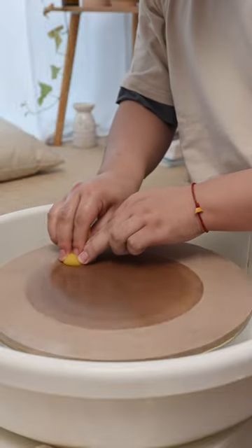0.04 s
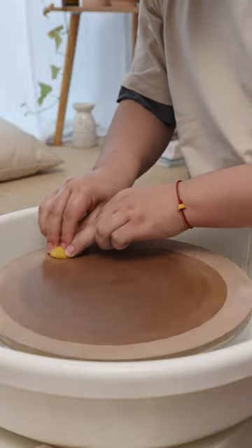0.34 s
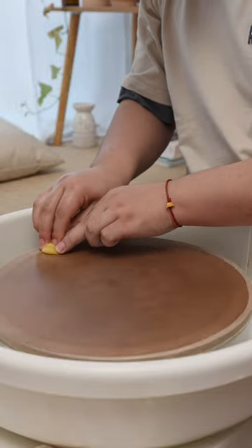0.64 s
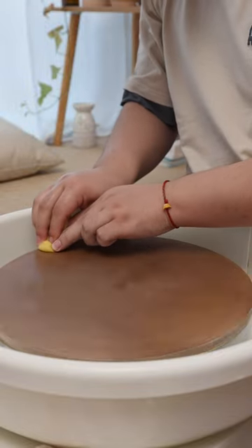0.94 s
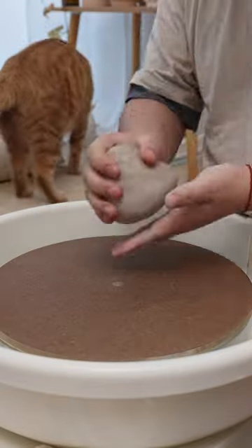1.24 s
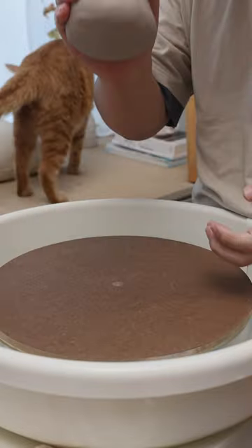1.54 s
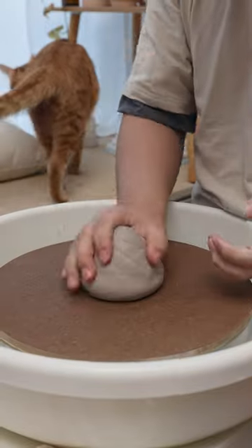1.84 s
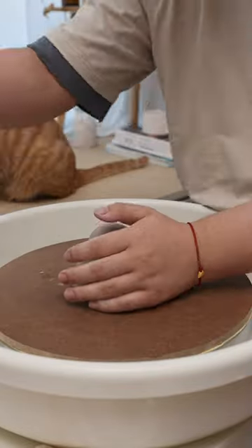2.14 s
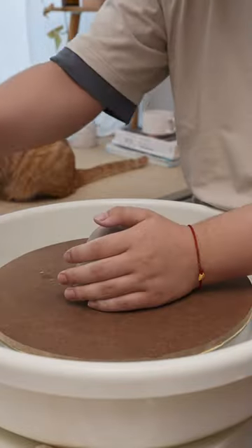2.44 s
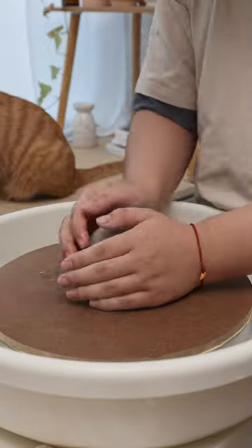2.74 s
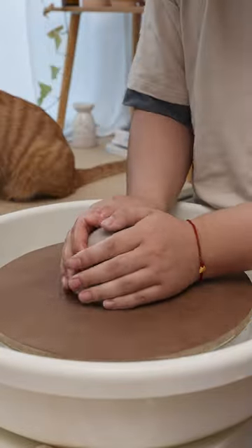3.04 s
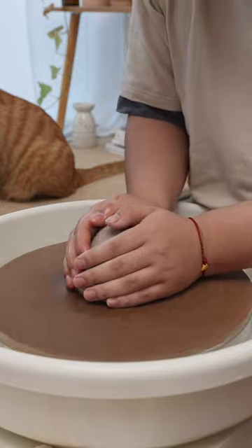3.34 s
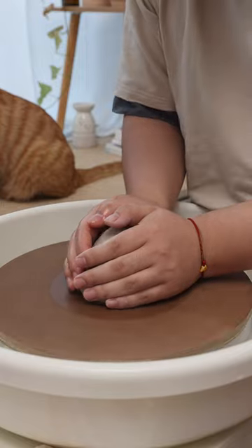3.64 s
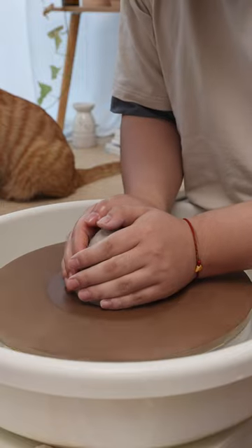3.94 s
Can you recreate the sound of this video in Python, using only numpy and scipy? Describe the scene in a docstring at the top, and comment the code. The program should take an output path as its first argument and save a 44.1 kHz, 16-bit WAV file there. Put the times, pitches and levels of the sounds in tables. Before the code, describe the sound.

A wet sponge hisses on a pottery wheel, then clay thuds down and is rubbed.

```python
"""A pottery wheel in a small room, in three scenes joined by hard cuts.
First a wet sponge hisses on the spinning bat, singing higher as it slides out to the rim.
Then, on the stopped wheel, a clay lump is lifted, thuds down and is patted while the wheel booms.
Last, with the wheel running, water plops as a hand is wetted, and wet palms rub the turning clay:
air pockets pop, and friction makes the wheel's body drone and groan."""
import sys
import numpy as np
from scipy import signal
from scipy.fft import rfft, irfft, next_fast_len
from scipy.io import wavfile
from scipy.ndimage import uniform_filter1d, map_coordinates

SR = 44100
rng = np.random.default_rng(int(sys.argv[2]) if len(sys.argv) > 2 else 0)


def waveform_to_disk(signal):
    """Save audio, clipped to [-1, 1], as 16-bit WAV at the path in sys.argv[1]."""
    frames = np.transpose(np.atleast_2d(signal))
    scaled = np.clip(frames, -1, 1) * 32767
    samples = np.round(scaled).astype(np.int16)
    wavfile.write(sys.argv[1], SR, samples)


N = 176400
T = np.arange(N) / SR
AGE = T[:SR]  # the one-second clock of a single hit


def amp(db):
    """Decibels to gain."""
    return 10 ** (np.asarray(db) / 20)


def unit(x):
    """Scale to rms 1."""
    return x / np.sqrt(np.mean(x ** 2) + 1e-20)


def along(points, hz):
    """Read (Hz, value) points on a log frequency axis."""
    freqs, values = np.transpose(points)
    return np.interp(np.log(hz + 1), np.log(freqs + 1), values)


def curves(rows):
    """One automation curve for each column after the time."""
    times, *columns = np.transpose(rows)
    return [np.interp(T, times, column) for column in columns]


def wobble(rate):
    """A smooth random curve with `rate` knots a second."""
    return map_coordinates(rng.standard_normal(int(N * rate / SR) + 4), [T * rate])


def fade(t60, t=AGE):
    """Exponential decay, 60 dB down after t60 seconds."""
    return np.exp(-np.log(1000) * t / np.maximum(t60, 1e-4))


def attack(seconds):
    """A hit's onset, with this time constant."""
    return 1 - np.exp(-AGE / seconds)


def swell(peak_s, spread_s):
    """A bell-shaped rise and fall."""
    return np.exp(-.5 * ((T - peak_s) / spread_s) ** 2)


def add(track, start_s, sound):
    """Mix a sound into the track."""
    part = track[round(start_s * SR):][:len(sound)]
    part += sound[:len(part)]


def filtered(x, response):
    """EQ x with a gain given as a function of Hz."""
    size = next_fast_len(N + SR // 2)
    return irfft(rfft(x, size) * response(np.fft.rfftfreq(size, 1 / SR)), size)[..., :N]


def rush(spectrum, patchy_db=0):
    """Coloured noise of rms 1, with patches of random gain in time and frequency."""
    bins = signal.stft(rng.standard_normal(N), nperseg=512)[2]
    patches = uniform_filter1d(rng.standard_normal(bins.shape), size=9, axis=0)
    patches = uniform_filter1d(patches, size=14, axis=1)
    noise = signal.istft(bins * amp(patchy_db * unit(patches)), nperseg=512)[1][:N]
    return unit(filtered(noise, lambda hz: amp(along(spectrum, hz))))


def narrow(hz, width_hz):
    """Noise of rms 1 in one resonance; hz may move."""
    band = filtered(rng.standard_normal(N), lambda f: 1 / (1 + (f / width_hz) ** 2))
    return unit(band * np.sin(2 * np.pi * np.cumsum(hz * np.ones(N)) / SR))


# The palms' strokes. Each row: time in seconds, relative hiss level in dB, relative smear level in dB.
PALM_STROKES = [(2.7, -44.5, -41.5), (2.89, -47.5, -39.5), (2.96, -50, -51.5), (3.08, -28.5, -34.5),
                (3.232, -24.5, -36), (3.434, -25, -37.5), (3.464, -29.5, -44.5), (3.506, -32.5, -37),
                (3.576, -28, -38.5), (3.63, -37, -38), (3.698, -26.5, -38), (3.764, -30, -37),
                (3.774, -28.5, -26), (3.782, -25, -35), (3.956, -30, -39.5), (4.0, -33.5, -29.5)]
# The palms' drag on the wheel. Each row: time in seconds, drone level in dB.
PALM_DRAG = [(2.15, -81), (2.84, -60), (2.885, -36), (2.97, -41), (3.1, -41), (3.21, -38.5), (3.4, -40),
             (3.62, -41), (3.72, -40), (3.85, -35.5), (3.94, -37.5), (4, -31)]
# Tone of the bright slip and the dull smear. Each row: frequency in Hz, relative level in dB.
SLIP_EQ = [(600, -35.5), (1500, 2.5), (2300, -3), (3700, 0.5), (5000, -3), (6700, 0), (9000, -2.5),
           (12000, -2), (16000, -3.5)]
SMEAR_EQ = [(100, -16), (500, -3.5), (800, 2), (1150, 2.5), (1600, -8.5), (2100, -1.5), (3000, -20.5),
            (8000, -37)]


def palms():
    """Wet skin slides on turning clay: fizzy hiss, lower smear and rumble over the sounding wheel."""
    slip_db, smear_db = curves(PALM_STROKES)
    slip = amp(slip_db + 1) * rush(SLIP_EQ, patchy_db=-0.1) * amp(1.34 * wobble(1500))
    smear = amp(smear_db + 0.5) * rush(SMEAR_EQ, patchy_db=1) * amp(0.71 * wobble(180))
    rumble_gain = amp(smear_db - 11.5 + 3 * wobble(9))
    rumble = rumble_gain * rush([(20, 6.5), (45, -2), (70, -3.5), (130, -27.5), (500, -62.5)])
    touch = np.interp(T, [2.65, 3.05], [0, 1])
    return touch * (pan_echoes(slip + smear) + rumble) + drone(PALM_DRAG) + groan()


# The sponge's wipe. Each row: time in seconds, relative hiss level in dB.
SPONGE_WIPE = [(0.0, -25.5), (0.024, -27.5), (0.342, -29), (0.418, -29), (0.534, -31), (0.632, -28.5),
               (0.786, -30), (0.846, -29.5), (1.034, -32), (1.066, -31), (1.13, -33.5)]
# Water film squeezed out. Each row: time in seconds, resonance in Hz, relative level in dB.
FILM_SQUEEZE = [(0, 6400, -40), (.12, 6200, -37), (.23, 6300, -28.5), (.33, 6700, -30), (.46, 7300, -26.5),
                (.58, 7700, -31), (.72, 8200, -35), (.78, 8300, -54), (1.13, 8800, -45.5)]
# The sponge's drag on the wheel. Each row: time in seconds, relative drone level in dB.
SPONGE_DRAG = [(0.0, -42), (0.028, -42), (0.428, -45), (0.496, -39.5), (0.528, -42), (0.678, -39.5),
               (0.73, -48.5), (0.776, -34.5), (0.848, -41.5), (0.902, -44), (0.918, -35), (0.978, -44),
               (1.0, -35.5), (1.044, -42.5), (1.066, -36), (1.13, -45)]
# Tone of the hiss and the film's broad fizz. Each row: frequency in Hz, relative level in dB.
HISS_EQ = [(100, -10), (500, -23.5), (1100, -17), (2000, -11.5), (2900, -8.5), (3600, -11), (4350, -2),
           (5000, -11.5), (6000, -5.5), (8000, -5), (12500, 0), (16000, -4.5)]
FIZZ_EQ = [(400, -24), (1100, -10), (2000, -9.5), (3100, -3), (5500, 2), (9300, 5), (11000, -7.5),
           (16000, -16.5)]


def sponge():
    """Fine hiss, with two resonances that climb as the sponge slides out to the faster rim."""
    hiss_db, = curves(SPONGE_WIPE)
    hz, squeeze_db = curves(FILM_SQUEEZE)
    width_hz = .08 * hz.mean()
    sing = narrow(hz, width_hz) + amp(-9) * narrow(1.27 * hz, width_hz)
    film = amp(squeeze_db) * (amp(-1.5) * sing + amp(-0.5) * rush(FIZZ_EQ, patchy_db=1.0))
    hiss = amp(hiss_db + 3.5) * rush(HISS_EQ, patchy_db=2.0)
    return pan_echoes(hiss + film) * amp(0.38 * wobble(72.6)) + amp(1.5) * drone(SPONGE_DRAG)


# The lump's landing, then the pats. Each row: start in seconds, gain in dB, crack level within
# the blow in dB, corner in Hz above which the ring is dulled.
BLOWS = [(1.899, 1, -2.5, 5000), (1.92, -15.5, -8, 900), (1.929, -9, -31.5, 600), (1.977, -30, -1, 900),
         (2.1087, -23, -16, 1200), (2.117, -19, -12, 400), (2.123, -25, -18, 700)]
# Modes of the struck clay and wheel. Each row: pitch in Hz, relative level in dB, t60 in seconds.
THUD_MODES = [(63.4, -26, 0.16), (197, -12, 0.051), (281, -11.5, 0.1), (367, -22.5, 0.23),
              (402, -3.5, 0.054), (435, -25, 0.37), (632, -18, 0.15), (793, 2, 0.013), (1010, -27, .04),
              (1280, -40, 0.12), (1370, -4.5, 0.018), (1740, -29, 0.074)]
# Tone of the crack, the splat and the room's wash. Each row: frequency in Hz, relative level in dB.
CRACK_EQ = [(200, 9.5), (1400, 1.5), (2500, -15), (6000, -7.5), (11000, -11.5), (16000, -26)]
SPLAT_EQ = [(40, -16), (110, -6), (200, 4.5), (400, -1), (520, -11), (900, -7), (1500, -11), (2300, -32),
            (3000, -19), (5000, -33), (16000, -54)]
WASH_EQ = [(50, -3), (100, -8), (160, 8.5), (420, 4.5), (530, -1.5), (800, 0), (1300, -8.5), (2200, -20.5),
           (4000, -23.5), (8000, -35.5), (16000, -43)]


def lump():
    """Each blow cracks, splats, rings the wheel and washes into the room; soft blows ring duller."""
    out = np.zeros(N)
    for start, db, crack_db, corner_hz in BLOWS:
        ring = -sum(amp(mode_db) / np.hypot(1, hz / corner_hz) * fade(t60) * np.sin(2 * np.pi * hz * AGE)
                    for hz, mode_db, t60 in THUD_MODES)
        crack = amp(crack_db) * fade(t60=.011) * rush(CRACK_EQ)[:SR]
        splat = amp(-12) * fade(t60=.09) * rush(SPLAT_EQ)[:SR]
        wash = amp(-19.5) * fade(t60=.45) * rush(WASH_EQ)[:SR]
        add(out, start, amp(db) * (ring + crack + splat + wash) * attack(.00006))
    return out


def boom():
    """After the landing, the loaded wheel's low ring wavers and sags in pitch."""
    rest_hz, sag_hz, sag_s = 116.4, 32, 0.061
    hz = rest_hz + sag_hz * np.exp(-AGE / sag_s)
    envelope = amp(-26 + 4 * wobble(54)[:SR]) * fade(t60=1.0) * attack(.015)
    out = np.zeros(N)
    add(out, BLOWS[0][0], envelope * np.sin(2 * np.pi * np.cumsum(hz) / SR))
    return out


# Drops and their bubbles. Each row: start in seconds, starting pitch in Hz, level in dB,
# t60 in seconds, rise as a share of the pitch.
DROPS = [(2.1506, 2910, -24.5, 0.033, 0.053), (2.152, 3790, -25, 0.022, 0.21),
         (2.172, 1317, -28, 0.04, 0.076), (2.172, 7560, -31, 0.021, 0.11), (2.183, 3070, -42, 0.028, 0.162),
         (2.2585, 5670, -36, 0.022, 0.21), (2.2775, 4120, -40, .025, .06), (2.314, 1098, -12.5, 0.079, .01),
         (2.3136, 1296, -14.5, 0.025, .03), (2.3136, 2180, -23.5, 0.015, .1),
         (2.314, 3440, -21.5, 0.037, 0.26), (2.3308, 3790, -26.5, 0.071, 0.054),
         (2.334, 8470, -19, 0.012, 0.094), (2.3364, 10030, -14, 0.013, 0.12), (2.365, 4300, -29, 0.02, .1),
         (2.3653, 6670, -24, 0.017, 0.18), (2.3752, 2057, -28.5, 0.046, .05),
         (2.5438, 4140, -24, 0.028, 0.045)]


def water():
    """Each drop is a tick, a puff of spray and a rising bubble; smaller bubbles flutter more."""
    rise_s, flutter, small_bubble_hz = .005, .03, 2980
    out = np.zeros(N)
    for start, hz, db, t60, rise in DROPS:
        smallness = min(hz / small_bubble_hz, 1)
        glide = 1 + rise * attack(rise_s) + flutter * smallness * wobble(1470)[:SR]
        bubble = np.sin(2 * np.pi * hz * np.cumsum(glide) / SR)
        spray = amp(-7) * smallness * narrow(hz * (1 + rise / 2), width_hz=0.26 * hz)[:SR]
        tick = amp(-9) * rng.standard_normal(SR) * fade(t60=0.0049)
        add(out, start, amp(db) * ((bubble + spray) * fade(t60) + tick) * attack(0.00097))
    return room(out, wet_db=-8.5)


# Air pockets bursting under the palms. Each row: start in seconds, relative level in dB.
AIR_POPS = [(2.8147, -32.5), (3.7713, -7.5)]
# A pocket's ring. Each row: pitch in Hz, relative level in dB, t60 in seconds.
POCKET_MODES = [(1320, -4.5, .012), (3670, -3.5, .009), (4860, -9, 0.0095)]


def pops():
    """Air trapped in the slip bursts out with a dry snap and a short ring."""
    out = np.zeros(N)
    ring = sum(amp(db) * fade(t60) * np.sin(2 * np.pi * hz * AGE) for hz, db, t60 in POCKET_MODES)
    for start, db in AIR_POPS:
        snap = amp(-8) * fade(t60=0.0091) * rush([(200, -4), (600, -1), (5000, -3), (8000, -18)])[:SR]
        add(out, start, amp(db + 5.5) * (ring + snap) * attack(0.0011))
    return out


# Modes of the rubbed wheel. Each row: pitch in Hz, bandwidth in Hz, relative level in dB.
BODY_MODES = [(82.4, 16, -9.5), (165, 37.5, -9), (252.8, 31, -1), (324.5, 26.6, -0.5), (388.4, 28.5, -0.5),
              (430.6, 28.6, 0.5), (578, 39, -10.5), (748, 17, -3)]


def drone(drag):
    """Friction shakes the wheel's body resonances, rolled off above 600 Hz."""
    def body(f):
        modes = sum((-1) ** k * amp(db) * 1j * f * width / (hz * hz - f * f + 1j * f * width)
                    for k, (hz, width, db) in enumerate(BODY_MODES))
        return modes / (1 + (f / 600) ** 4)
    drone_db, = curves(drag)
    return amp(drone_db) * unit(filtered(rng.standard_normal(N), body))


# The palms bearing down. Each row: time in seconds, groan gain in dB.
PALM_PRESSURE = [(2.9, -60), (3.1, -44), (3.3, -45), (3.64, -53), (3.72, -36), (3.81, -43), (3.89, -33),
                 (4, -39)]
# The groan's two notes. Each row: pitch in Hz, relative level in dB.
GROAN_NOTES = [(382, -2.5), (430, -3)]


def groan():
    """Two narrow resonances of the wheel stand out as the palms press harder."""
    groan_db, = curves(PALM_PRESSURE)
    return amp(groan_db) * sum(amp(db) * narrow(hz, width_hz=11.3) for hz, db in GROAN_NOTES)


# Bumps of the spinning wheel. Each row: peak time in seconds, pitch in Hz, level in dB.
WHEEL_BUMPS = [(.585, 80, -40), (0.811, 84, -40), (1.038, 87, -43), (3.19, 49, -39), (3.872, 51.7, -33)]


def bumps():
    """Low, soft knocks as the hands ride over uneven spots."""
    return sum(amp(db) * swell(peak, spread_s=0.023) * np.sin(2 * np.pi * hz * (T - peak))
               for peak, hz, db in WHEEL_BUMPS)


# Lifting moves. Each row: peak time in seconds, spread in seconds, level in dB.
LIFTS = [(1.29, 0.042, -80), (1.536, 0.056, -71.5)]
# Tone of the rustle. Each row: frequency in Hz, relative level in dB.
RUSTLE_EQ = [(200, -0.5), (1000, 5), (3000, -9), (8000, -23), (16000, -25)]


def lifting():
    """Sleeve and hands rustle faintly as the lump is raised."""
    envelope = sum(amp(db) * swell(peak, spread) for peak, spread, db in LIFTS)
    return envelope * rush(RUSTLE_EQ, patchy_db=2.5)


def pan_echoes(x):
    """Weak early echoes from the bat and the splash pan colour a close sound."""
    count, span_s, gain = 8, .012, 0.098
    echoes = rng.random((count, 2))
    def comb(f):
        reflections = sum(np.sign(polarity - .5) * np.exp(-2j * np.pi * f * delay * span_s)
                          for delay, polarity in echoes)
        return 1 + gain * reflections * f / (f + 700)  # the echoes carry little bass
    return filtered(x, comb) / np.sqrt(1 + count * gain ** 2)


# The room's decay. Each row: frequency in Hz, t60 in seconds.
ROOM_DECAY = [(100, .6), (1200, .4), (4200, .4), (7000, .24), (14000, .17)]
# Tone of the reverb. Each row: frequency in Hz, gain in dB.
REVERB_EQ = [(60, -7.5), (900, -6.5), (2500, 4), (4200, -3), (7000, -0.5), (12000, 6)]


def room(x, wet_db):
    """The small room adds a short tail whose treble dies first."""
    hz, t, bins = signal.stft(rng.standard_normal(SR), SR, nperseg=256)
    decay = fade(along(ROOM_DECAY, hz)[:, None], t)
    tail = signal.istft(bins * decay, SR, nperseg=256)[1][:SR]
    tail = tail * np.clip(AGE / 0.004, 0, 1)
    wet = signal.fftconvolve(x, tail / np.linalg.norm(tail))[:N]
    return x + amp(wet_db) * filtered(wet, lambda hz: amp(along(REVERB_EQ, hz)))


# Noise beds with the wheel stopped and running. Each row: frequency in Hz, relative level in dB.
QUIET_EQ = [(15, -33.5), (25, -8.5), (53, -12), (91, 2), (118, -7), (367, -17.5), (1060, -22), (1270, -28),
            (12000, -38), (15600, -70), (22000, -120)]
RUNNING_EQ = [(25, 3), (85, 4), (200, 1.5), (400, -7.5), (900, -6.5), (2000, -20), (4000, -17), (8000, -27),
              (12500, -26.5), (16000, -76)]
# Stereo width of the beds. Each row: frequency in Hz, side over mid in dB.
BED_WIDTH = [(100, -46.5), (500, -32), (2000, -26.5), (6000, -10), (16000, -1)]


def background(spectrum):
    """Mid and side of a steady noise bed, wide only in the treble."""
    side = filtered(rush(spectrum), lambda hz: amp(along(BED_WIDTH, hz)))
    return np.array([rush(spectrum, patchy_db=2.0), side])


def centred(x):
    """Mid and side of a close source straight ahead."""
    return np.array([x, np.zeros(N)])


def cut(at_s):
    """A gate that opens over 3 ms."""
    return np.clip((T - at_s) / .003 + .5, 0, 1)


def scene():
    """Sponging, the lump on the stopped wheel, then hands on turning clay: cut together, almost mono."""
    knocks = bumps()
    wiping = centred(sponge() + knocks)
    stopped = centred(lump() + boom() + lifting())
    stopped += amp(-67 + 0.4 * wobble(5.6)) * background(QUIET_EQ)
    turning = centred(water() + pops() + palms() + knocks) + amp(-44.5) * background(RUNNING_EQ)
    first_cut, second_cut = cut(at_s=1.139), cut(at_s=2.141)
    mid, side = (1 - first_cut) * wiping + first_cut * (1 - second_cut) * stopped + second_cut * turning
    return np.array([mid + side, mid - side])


def record(dry):
    """Soft clipping just catches the thud; a steep low-pass removes the very top."""
    top_hz = 15900
    clipped = dry / (1 + dry ** 8) ** (1 / 8)
    return filtered(clipped, lambda hz: 1 / np.sqrt(1 + (hz / top_hz) ** 240))


dry = scene()
out = record(dry)
waveform_to_disk(out)
```